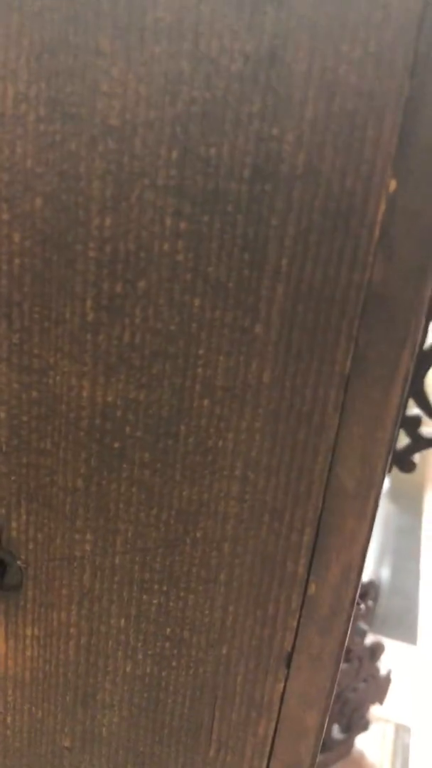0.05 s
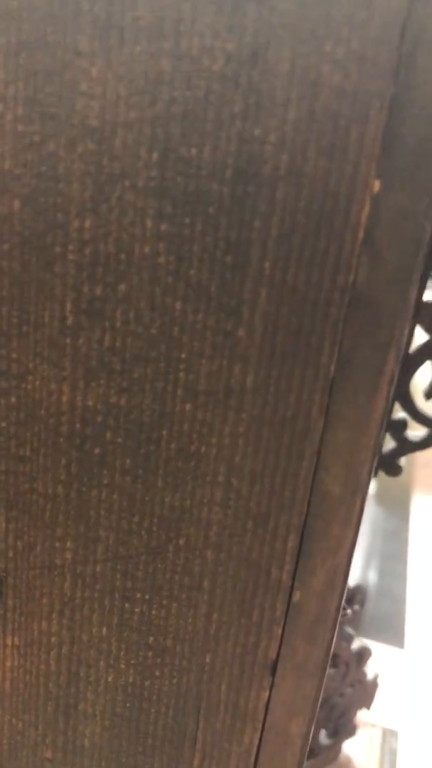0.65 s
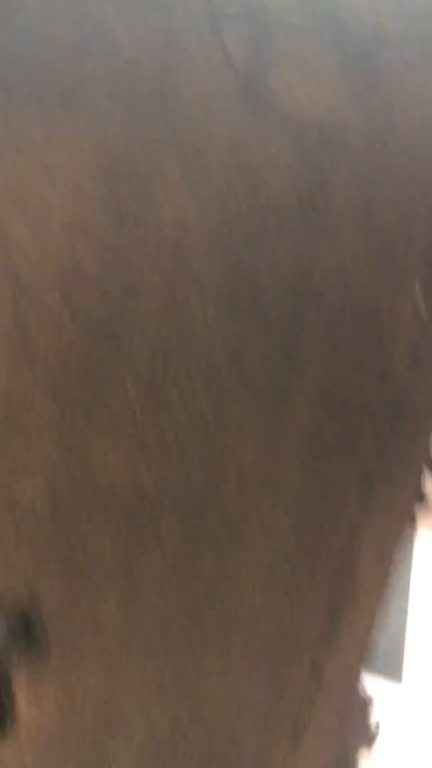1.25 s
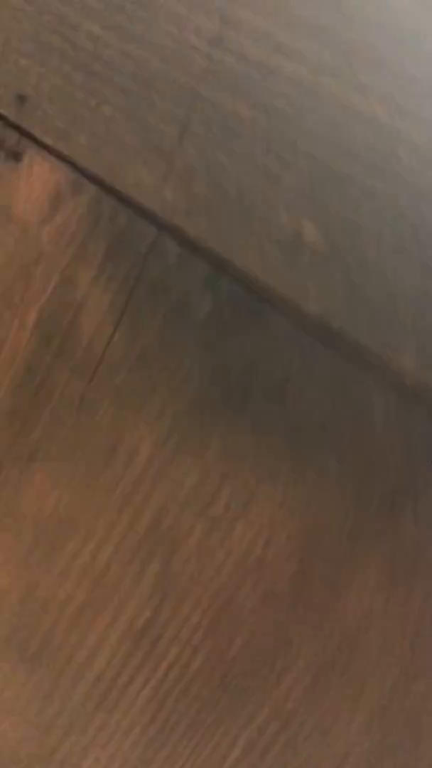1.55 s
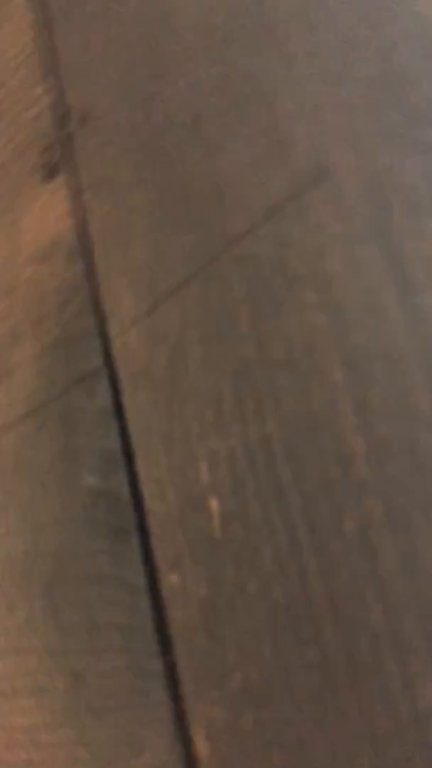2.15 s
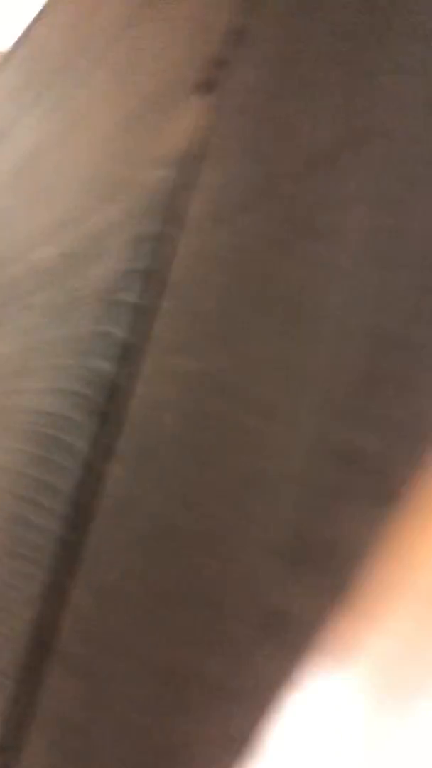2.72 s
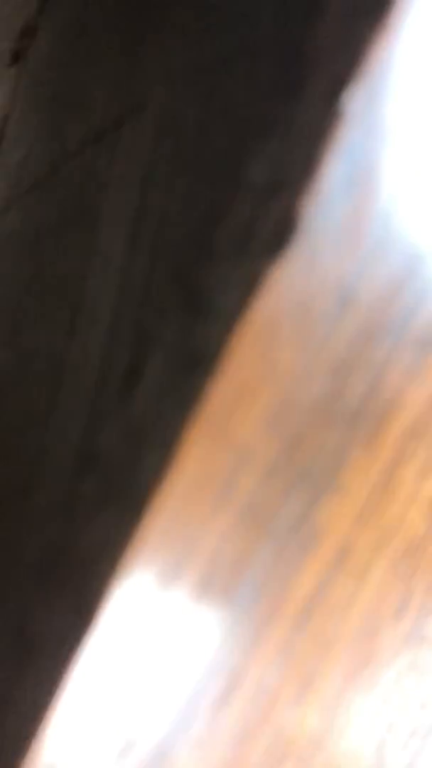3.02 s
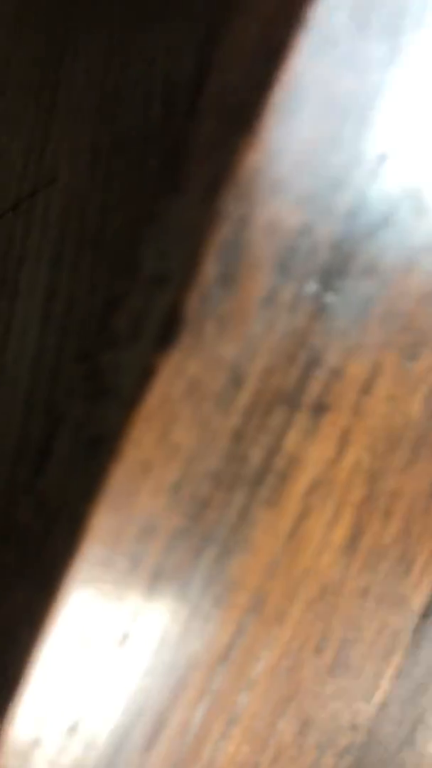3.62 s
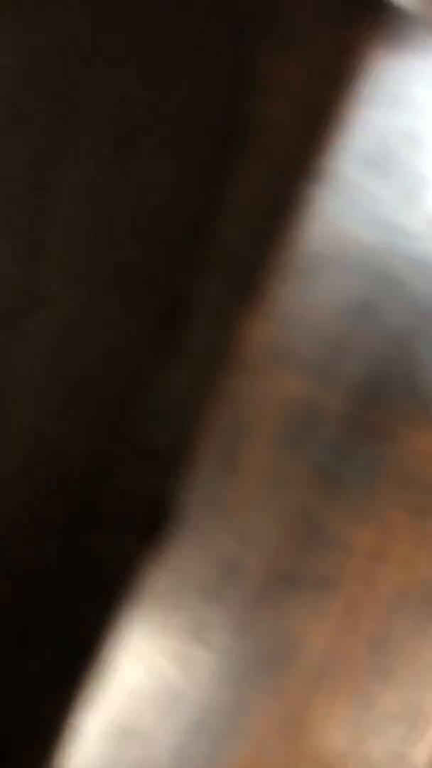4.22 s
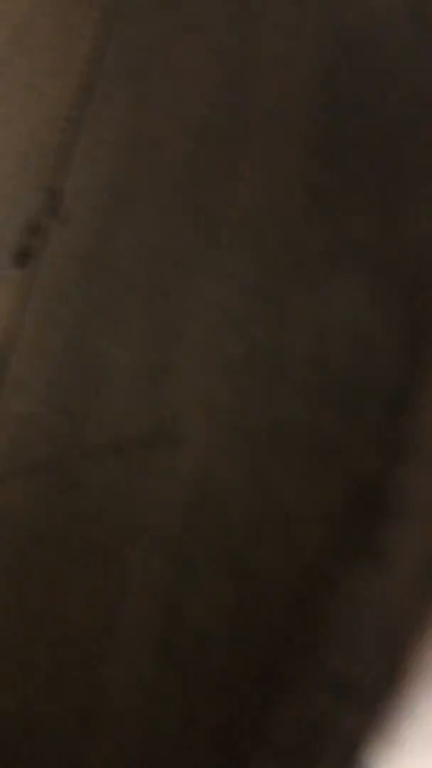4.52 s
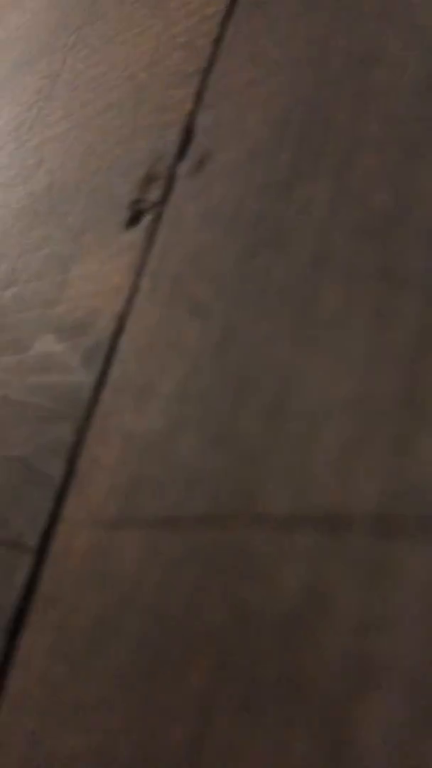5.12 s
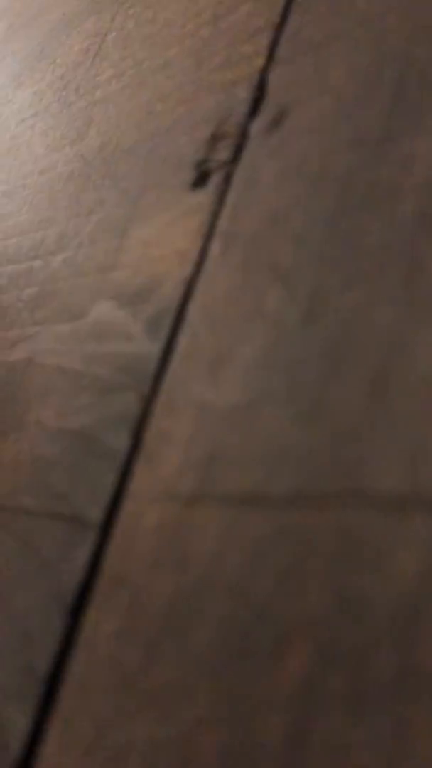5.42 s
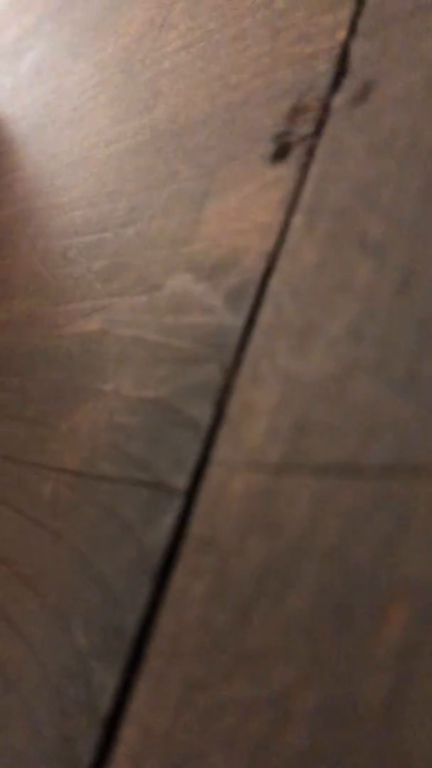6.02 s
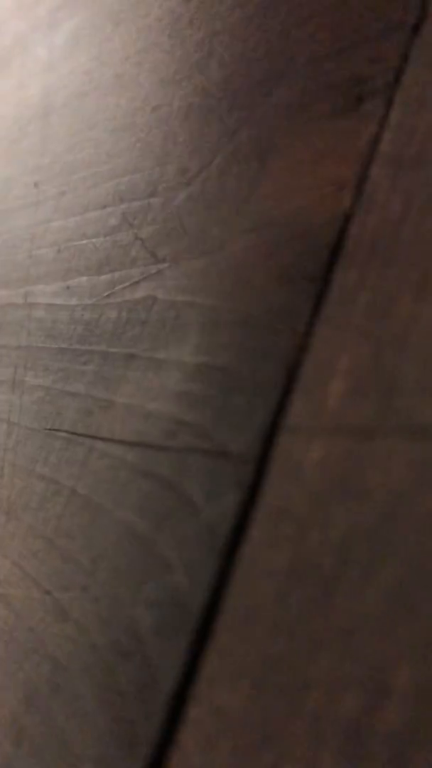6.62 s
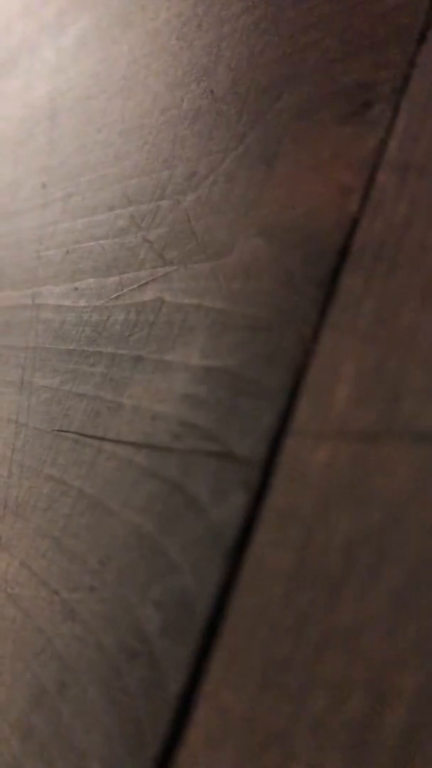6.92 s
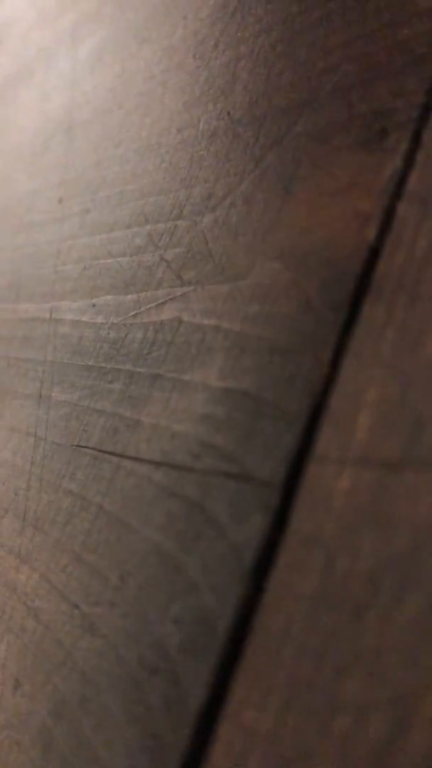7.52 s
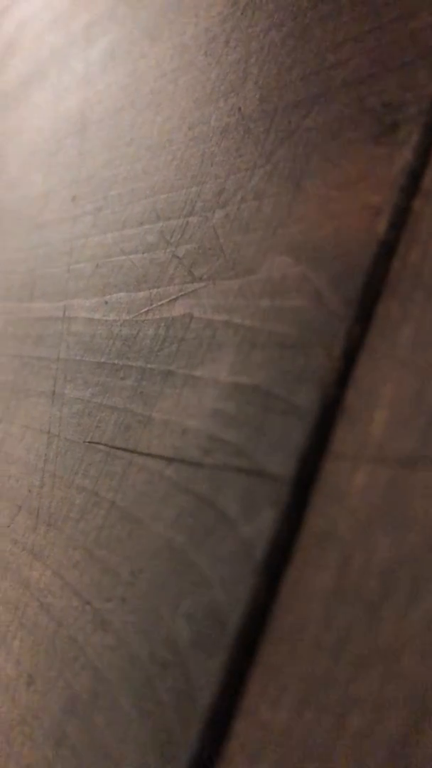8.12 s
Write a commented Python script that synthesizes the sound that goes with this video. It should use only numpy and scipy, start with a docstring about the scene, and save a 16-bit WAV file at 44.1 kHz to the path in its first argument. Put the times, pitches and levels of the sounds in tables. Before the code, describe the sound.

Close, lopsided pendulum clock ticking over a low hum, with scattered knocks on the wooden case and a final rattling door bang.

```python
"""Pendulum clock and case door.

An old clock ticks, slightly out of beat, in its wooden case: each beat is a pallet's dull release,
then a bright brass click. A hand moves the door close to the microphone; it clicks, scuffs and
knocks, and the gong wire rings faintly along. At last the door bangs against its frame.
Behind it, a quiet room with a low hum."""
import sys
import numpy as np
from scipy import signal
from scipy.fft import rfft, irfft, next_fast_len
from scipy.io import wavfile
from scipy.ndimage import map_coordinates

SR = 44100
rng = np.random.default_rng(int(sys.argv[2]) if len(sys.argv) > 2 else 0)


def store_pcm(level_fs):
    """Save levels as 16-bit WAV."""
    pcm = np.round(np.clip(level_fs, -1, 1) * 32767).astype(np.int16)
    wavfile.write(sys.argv[1], SR, np.atleast_2d(pcm).T)


N = 368235
TIME_S = np.arange(N) / SR
AGE_S = np.arange(SR) / SR  # since a blow

# Noise and impact spectra. Each row: frequency in Hz, relative density in dB.
RUMBLE_SPECTRUM = [(22, -44), (33, -33), (40, -8.5), (53, -10), (62, 3), (68, -4), (105, -6.5), (140, -18),
                   (178, -8), (205, -14.5), (225, -19), (260, -21), (360, -23.5), (520, -29.5), (900, -58)]
HISS_SPECTRUM = [(300, -5.5), (600, 5), (1100, 1), (1400, -3), (2000, -3.5), (2800, -3.5), (3100, -4),
                 (3500, -8), (4100, -15), (5200, -6.5), (7000, -9.5), (8700, -17), (10000, -15.5),
                 (15800, -17)]
SIZZLE_SPECTRUM = [(3500, -16), (5200, -10.5), (5780, 6.5), (6050, -2), (6400, 0.5), (7150, -7),
                   (7600, -13.5), (10000, -46)]
RUB_SPECTRUM = [(250, 13.5), (700, 5), (1500, 3), (2600, 0.5), (4500, -5), (7500, -13.5), (11000, -10.5),
                (15800, -22)]
FLEX_SPECTRUM = [(60, -37), (140, -3.5), (230, 4.5), (680, -0.5), (880, -15.5), (1450, -11.5), (3000, -30),
                 (9000, -40)]
WOOD_SPECTRUM = [(90, -20), (250, -7), (650, 2), (900, 9), (1500, 1), (3000, 0), (8000, 3.5), (16000, -13)]
RATTLE_SPECTRUM = [(100, -11), (300, 6), (700, 2), (1000, 0), (1700, 3), (2500, -10), (3400, -8),
                   (4400, -17.5), (5700, -15.5), (7000, -23.5), (9500, -23), (15800, -32)]
RELEASE_SPECTRUM = [(300, -11), (700, 3), (1200, 0.5), (1950, 4), (2400, -3.5), (2850, 0), (3500, -6),
                    (4600, -4.5), (5400, -23), (9500, -12), (15000, -43)]
DROP_SPECTRUM = [(900, -24), (2500, -8.5), (4600, -10), (6500, 2), (7500, -10.5), (8300, 1), (9000, -4),
                 (10000, 2), (11500, -2.5), (13000, 2), (14200, -10), (15800, -24)]

# Mains and motor hum. Each row: frequency in Hz, rms in dB.
HUM_LINES = [(120.4, -54), (59.9, -58.5), (172.8, -64.5), (224.4, -67), (254, -79.5), (378.4, -76.5)]
# Thin whine. Each row: time in seconds, rms of the low tone and of the high tone in dB.
WHINE_LEVELS = [(0, -87, -84.5), (3.5, -79, -80), (6.5, -75.5, -82.5), (8.3, -76, -92)]
# Hiss band near 6 kHz. Each row: time in seconds, rms in dB.
SIZZLE_LEVELS = [(0.0, -73), (1.12, -73.5), (3.4, -69), (4.43, -68.5), (4.96, -73), (8.2, -72.5)]
# Room decay. Each row: frequency in Hz, t60 in seconds.
ROOM_DECAY = [(150, 0.37), (1000, 0.39), (5000, 0.055), (15000, 0.15)]
# Faint squeaks. Each row: start and length in seconds, first and last pitch in Hz, rms in dB.
SQUEAK_EVENTS = [(2.79, .18, 4230, 4000, -80.5), (4.85, 0.46, 8400, 7500, -90)]

# Case, gong wire, door with catch. Each row: frequency in Hz, relative level in dB, t60 in seconds.
CASE_MODES = [(193, -14, 0.19), (234, -5.5, 0.2), (252, -12, 0.34), (290, -4, 0.17), (344, -19, 0.087),
              (453, 5, 0.049), (554, -8, 0.04), (588.5, -6.5, 0.21), (653, -14.5, 0.12), (696.6, -6, 0.11),
              (970, -4.5, 0.042), (1035, -8, 0.11), (1220, -13, 0.022), (1433, -11, 0.15),
              (1700, -21, 0.06), (2280, -12, 0.13)]
GONG_MODES = [(186.6, -4.5, 2.1), (389, 2.5, 1.18), (1425, -5, 0.63)]
DOOR_MODES = [(172, -9, 0.22), (209, -5.5, 0.12), (245, 5.5, 0.1), (281.4, -6, 0.15), (400, -15, 0.29),
              (524, -1.5, 0.073), (617, -10, 0.21), (700, -15, 0.35), (895, -19, 0.09), (1100, -13, 0.12),
              (1350, -14, 0.1), (1444, -13, 0.13), (1664, -9, 0.058), (1920, -26, 0.057),
              (3083, -13, 0.093), (4780, -9.5, 0.061)]
# Hand and door scuffs. Each row: start in seconds, top rms in dB, t60 in seconds, treble lift in dB.
SCUFF_EVENTS = [(.135, -61.5, 0.068, -1), (1.782, -56, 0.043, 18), (2.66, -70.5, 0.47, 30),
                (3.325, -61, .33, -20), (3.672, -56.5, 0.34, -12), (3.732, -51, 0.1, 2),
                (3.809, -52.5, .07, -2), (6.718, -53, 0.15, -5), (6.940, -49.5, 0.069, -21),
                (7.011, -57, .04, -7)]
# Knocks on the case. Each row: start in seconds, wood peak in dB, low-pass edge in Hz,
# pitch the struck spot favours in Hz, top scrape rms in dB, scrape t60 in seconds.
KNOCK_EVENTS = [(1.760, -44, 2420, 704, -49.5, 0.046), (2.093, -53, 900, 484, -55, 0.0053),
                (3.595, -44, 600, 274, -70, .02), (3.748, -31, 2600, 2260, -53, .03),
                (3.7571, -28.5, 760, 231, -41.5, 0.041), (3.776, -32.5, 1330, 690, -62, .03),
                (3.793, -35, 910, 670, -63, .03), (3.828, -40, 2400, 1390, -55, .045),
                (4.1, -44.5, 770, 557, -75, .02), (5.790, -30, 634, 535, -44.5, 0.022),
                (5.8743, -26, 616, 288, -70, .02), (5.935, -42.5, 1500, 230, -55, 0.024),
                (5.954, -24, 1360, 259, -58, .02), (6.191, -43.5, 1400, 400, -75, .02),
                (6.851, -29.5, 640, 235, -68, .02), (6.868, -38, 597, 290, -67, .02)]
# Door corners meeting the frame. Each row: start in seconds, panel peak in dB,
# low-pass edge in Hz, top rattle rms in dB.
BANG_CONTACTS = [(8.2611, -21.5, 5000, -28), (8.2755, -10, 420, -27), (8.2868, -13.5, 3000, -26),
                 (8.2947, -15.5, 2000, -40)]

# Clock frame; brass wheel and anchor. Each row: frequency in Hz,
# relative level on the entry and on the exit pallet in dB, t60 in seconds.
FRAME_MODES = [(1207, -3.5, -20, 0.096), (1810, -8, -1.5, .055), (1928, 5, -1.5, 0.033),
               (2230, 1, -17, 0.034), (2690, -19, 4, .035), (3200, -13, -5, 0.057), (4760, -10, -3, 0.032)]
BRASS_MODES = [(3630, -16, -14, 0.093), (6210, -28, -4.5, 0.055), (6890, 4, -3, 0.035),
               (8140, 15, 9, 0.024), (8020, -64, 0, 0.071), (9630, -27, -1, 0.053), (9740, -32, -13, 0.05),
               (11540, -19, -4, 0.057), (12680, -25, -16, 0.06), (13170, -11, -11, .05),
               (14740, 4.5, -1, 0.036)]
# Entry, then exit pallet. Each row: release lead in seconds, release gain and drop gain in dB,
# rebound relative to the drop in dB.
PALLET_CONTACTS = [(.010, -46, -46, -6), (0.0082, -45.5, -41.5, -6)]
# Escape wheel out of true. Each row: time in seconds, beat lateness in seconds.
BEAT_LAG = [(1.6, 0.00097), (3.5, -0.0035), (4.3, -0.0068), (5.0, 0.0014), (5.8, .004), (7.0, 0.0011)]
# Ticking as door and microphone move. Each row: time in seconds, gain in dB, treble tilt in dB.
TICK_TONE = [(1.5, -1, -2.5), (3.3, 0.6, 4), (4.6, -0.9, -2.5), (5.8, -0.5, -1), (7.2, 3, 1)]

FIRST_TICK_S, SWING_S, TOCK_AFTER_S = 0.501, 0.891, 0.3305  # early tock: out of beat
REBOUND_S = 0.008
GLANCING_DB, LIFT_DB_PER_DB = -34, 1.4  # lighter knocks glance off with a brighter scrape
HARD_KNOCK_DB, GONG_GAIN_DB, GONG_DB_PER_DB = -23.5, -27, 0.57  # lighter knocks stir the wire less


def amp(db):
    """Decibels to gain."""
    return 10 ** (np.asarray(db) / 20)


def unit_rms(x):
    """Scale to rms 1."""
    return x / np.sqrt(np.mean(x ** 2) + 1e-20)


def unit_peak(x):
    """Scale to peak 1."""
    return x / (np.abs(x).max() + 1e-20)


def at_hz(rows, hz):
    """Interpolate on a log frequency axis."""
    knots_hz, values = np.transpose(rows)
    return np.interp(np.log(hz + 1), np.log(knots_hz + 1), values)


def at_time(rows, time_s):
    """Interpolate each column after the time."""
    knots_s, *columns = np.transpose(rows)
    return [np.interp(time_s, knots_s, column) for column in columns]


def wobble(rate_hz):
    """Smooth random curve."""
    knots = rng.standard_normal(int(N * rate_hz / SR) + 4)
    return map_coordinates(knots, [np.arange(N) * rate_hz / SR])


def noise(spectrum, size=N):
    """Shaped noise, rms 1."""
    m = next_fast_len(size)
    gain = amp(at_hz(spectrum, np.fft.rfftfreq(m, 1 / SR)))
    return unit_rms(irfft(rfft(rng.standard_normal(m)) * gain, m)[:size])


def attack(rise_s):
    """Exponential rise to 1."""
    return 1 - np.exp(-AGE_S / rise_s)


def decay(t60_s):
    """Exponential fall, 60 dB in t60_s."""
    return np.exp(-np.log(1000) * AGE_S / t60_s)


def burst(spectrum, rise_s, t60_s):
    """Dense short modes: noise that swells and dies."""
    return noise(spectrum, len(AGE_S)) * unit_peak(attack(rise_s) * decay(t60_s))


def ring(modes, scatter_db, detune=0):
    """Damped modes, strengths redrawn per blow."""
    out = np.zeros(len(AGE_S))
    for k, (hz, db, t60_s) in enumerate(modes):
        gain = (-1) ** k * amp(db + scatter_db * rng.normal())
        pitch_hz = hz * (1 + detune * rng.normal())
        out += gain * decay(t60_s) * np.sin(2 * np.pi * pitch_hz * AGE_S)
    return out


def lowpass(x, edge_hz, order):
    """Causal Butterworth low-pass."""
    return signal.sosfilt(signal.butter(order, edge_hz, fs=SR, output="sos"), x)


def add(track, start_s, sound):
    """Mix a sound into the track."""
    part = track[round(start_s * SR):][:len(sound)]
    part += sound[:len(part)]


def tone(hz, drift_rad, rate_hz):
    """Sine with wandering phase, rms 1."""
    return np.sqrt(2) * np.sin(2 * np.pi * hz * TIME_S + drift_rad * wobble(rate_hz))


def background():
    """Room rumble, mains and motor hum, thin whine, soft hiss."""
    hum = sum(amp(db + 0.4 * wobble(4)) * tone(hz, drift_rad=0.7 if k else 0.1, rate_hz=2.8)
              for k, (hz, db) in enumerate(HUM_LINES))
    low_db, high_db = at_time(WHINE_LEVELS, TIME_S)
    high_tone = tone(3080, drift_rad=2.2, rate_hz=70)
    low_tone = tone(1055.5, drift_rad=0.18, rate_hz=5)
    whine = amp(low_db) * low_tone + amp(high_db + 1.5 * wobble(5)) * high_tone
    hiss = amp(-70 + 0.36 * wobble(3.02)) * noise(HISS_SPECTRUM)
    sizzle_db, = at_time(SIZZLE_LEVELS, TIME_S)
    sizzle = amp(sizzle_db + 0.39 * wobble(9.9)) * noise(SIZZLE_SPECTRUM)
    rumble = amp(-52.5) * noise(RUMBLE_SPECTRUM)
    return rumble + hum + whine + hiss + sizzle


def room(x):
    """Small-room tail; decay time varies with frequency."""
    hz, time_s, bins = signal.stft(rng.standard_normal(SR // 2), SR, nperseg=256)
    envelope = np.exp(-np.log(1000) * time_s / at_hz(ROOM_DECAY, hz)[:, None])
    _, tail = signal.istft(bins * envelope, SR, nperseg=256)
    return signal.fftconvolve(x, tail / np.linalg.norm(tail))[:N]


def squeaks():
    """Faint wavering tones that sag in pitch."""
    out = np.zeros(N)
    for start_s, length_s, first_hz, last_hz, db in SQUEAK_EVENTS:
        size = round(length_s * SR)
        hz = np.geomspace(first_hz, last_hz, size) * (1 + 0.013 * wobble(250)[:size])
        squeak = np.hanning(size) * np.sin(2 * np.pi * np.cumsum(hz) / SR)
        add(out, start_s, amp(db) * unit_rms(squeak))
    return out


def rub(rise_s, t60_s, lift_db):
    """Dry friction on wood, with a treble shelf."""
    spectrum = [(hz, db + lift_db * hz / (hz + 5000)) for hz, db in RUB_SPECTRUM]
    return burst(spectrum, rise_s, t60_s)


def scuffs():
    """Skin and door edge rub the wood; longer rubs swell more slowly."""
    out = np.zeros(N)
    for start_s, db, t60_s, lift_db in SCUFF_EVENTS:
        add(out, start_s, amp(db) * rub(0.089 * t60_s, t60_s, lift_db))
    return out


def panel_flex(travel_s, reference_hz):
    """Bending wave: speed goes as the root of frequency, so treble arrives first."""
    hz = np.fft.rfftfreq(len(AGE_S), 1 / SR)
    lag_rad = 4 * np.pi * travel_s * np.sqrt(reference_hz * hz)
    return unit_peak(irfft(amp(at_hz(FLEX_SPECTRUM, hz)) * np.exp(-1j * lag_rad), len(AGE_S)))


def knocks():
    """A blow scrapes, flexes and rings the case, a soft one only its low modes; the gong wire lingers."""
    out = np.zeros(N)
    flex = amp(12) * panel_flex(travel_s=0.004857, reference_hz=250)
    for start_s, db, edge_hz, spot_hz, scrape_db, scrape_t60_s in KNOCK_EVENTS:
        # modes that move most at the struck spot gain up to 10 dB
        modes = [(hz, mode_db + 10 * np.exp(-(np.log(hz / spot_hz) / 0.084) ** 2), t60_s)
                 for hz, mode_db, t60_s in CASE_MODES]
        body = ring(modes, scatter_db=-0.5) * attack(0.0048)
        clack = amp(-2) * burst(WOOD_SPECTRUM, rise_s=0.00055, t60_s=0.091)
        wood = unit_peak(lowpass(flex + body + clack, edge_hz, order=4))
        gong = lowpass(ring(GONG_MODES, scatter_db=0.5), edge_hz, order=2)
        gong_db = GONG_GAIN_DB + GONG_DB_PER_DB * (db - HARD_KNOCK_DB)
        scrape = rub(rise_s=0.00061, t60_s=scrape_t60_s, lift_db=LIFT_DB_PER_DB * (GLANCING_DB - db))
        add(out, start_s, amp(db) * (wood + amp(gong_db) * gong) + amp(scrape_db) * scrape)
    return out


def door_bang():
    """The door shuts in a quick run of contacts: the panel booms, the catch rattles."""
    out = np.zeros(N)
    for start_s, db, edge_hz, rattle_db in BANG_CONTACTS:
        panel = lowpass(ring(DOOR_MODES, scatter_db=4.5), edge_hz, order=2) * attack(0.0034)
        rattle = burst(RATTLE_SPECTRUM, rise_s=0.0026, t60_s=0.062)
        add(out, start_s, amp(db) * unit_peak(panel) + amp(rattle_db) * rattle)
    return out


def pendulum_beats():
    """Two uneven beats per swing: side 0 is the entry pallet, 1 the exit."""
    for tick_s in np.arange(FIRST_TICK_S, N / SR, SWING_S):
        for side, beat_s in enumerate([tick_s, tick_s + TOCK_AFTER_S]):
            lag_s, = at_time(BEAT_LAG, beat_s)
            gain_db, tilt_db = at_time(TICK_TONE, beat_s)
            yield beat_s + lag_s, side, gain_db, tilt_db


def pallet_modes(rows, side):
    """Modes as one pallet drives them."""
    return [(hz, exit_db if side else entry_db, t60_s) for hz, entry_db, exit_db, t60_s in rows]


def pallet_releases():
    """A pallet lets go of the wheel; the frame gives a dull, woody click."""
    out = np.zeros(N)
    for beat_s, side, gain_db, _ in pendulum_beats():
        lead_s, release_db, _, _ = PALLET_CONTACTS[side]
        frame = ring(pallet_modes(FRAME_MODES, side), scatter_db=3.5, detune=0.026) * attack(0.00088)
        click = burst(RELEASE_SPECTRUM, rise_s=0.00063, t60_s=0.095)
        add(out, beat_s - lead_s, amp(release_db + gain_db) * (amp(-10.5) * frame + amp(-10) * click))
    return out


def tooth_drops():
    """Just after each dull release comes a bright brass click that rebounds once."""
    out = np.zeros(N)
    for beat_s, side, gain_db, tilt_db in pendulum_beats():
        _, _, drop_db, rebound_db = PALLET_CONTACTS[side]
        shelf = [(9000, -1.13 * tilt_db), (12500, 0.31 * tilt_db)]
        modes = [(hz, db + at_hz(shelf, hz), t60_s) for hz, db, t60_s in pallet_modes(BRASS_MODES, side)]
        spectrum = [(hz, db + at_hz(shelf, hz)) for hz, db in DROP_SPECTRUM]
        for delay_s, contact_db in [(0, 0), (REBOUND_S, rebound_db)]:
            brass = amp(-12.5) * ring(modes, scatter_db=6, detune=0.0087) * attack(0.0029)
            clack = amp(-8) * burst(spectrum, rise_s=0.0016, t60_s=0.031)
            add(out, beat_s + delay_s, amp(drop_db + gain_db + contact_db) * (brass + clack))
    return out


def scene():
    """Clock and door close by, the room behind; mono."""
    ticks = pallet_releases() + tooth_drops()
    door = knocks() + scuffs() + door_bang()
    reverb = room(amp(-13) * ticks + amp(-18.5) * door)
    return (ticks + door + reverb + squeaks() + background())[None]


def record(dry):
    """Microphone band limits: deep bass rolls off, the top is cut."""
    bass_hz, top_hz = 31, 15900
    m = next_fast_len(N + SR)
    hz = np.fft.rfftfreq(m, 1 / SR)
    bass_cut = 1 / np.sqrt(1 + (bass_hz / (hz + 1)) ** 10)
    return irfft(rfft(dry, m) * bass_cut * (hz < top_hz), m)[..., :N]


dry = scene()
out = record(dry)
store_pcm(out)
```